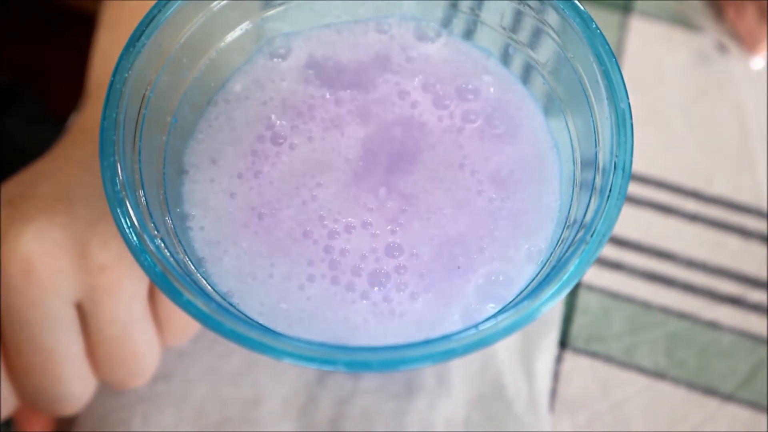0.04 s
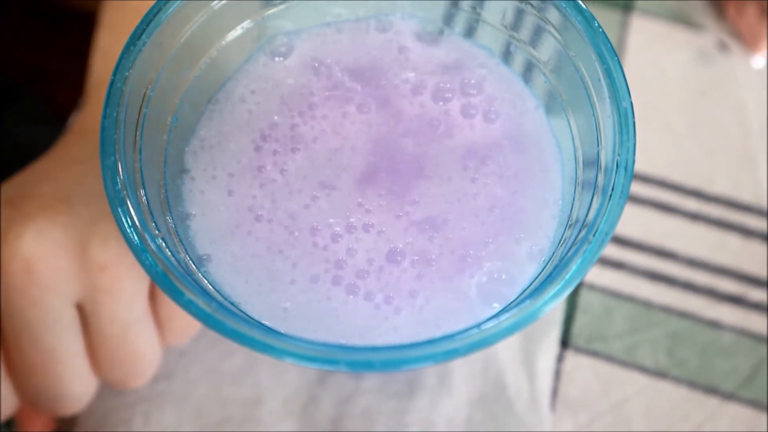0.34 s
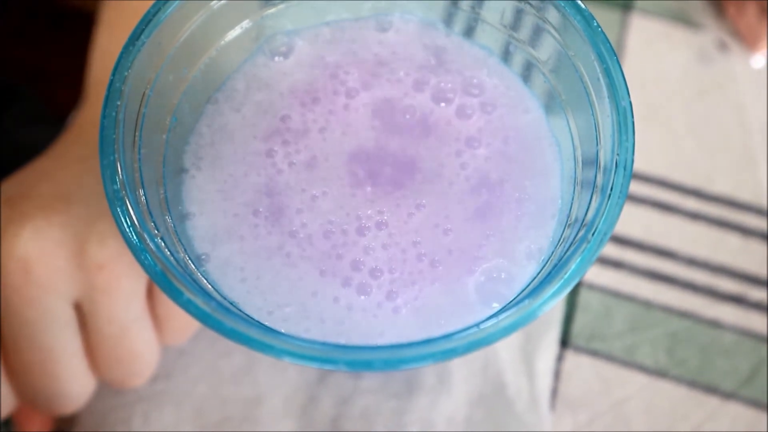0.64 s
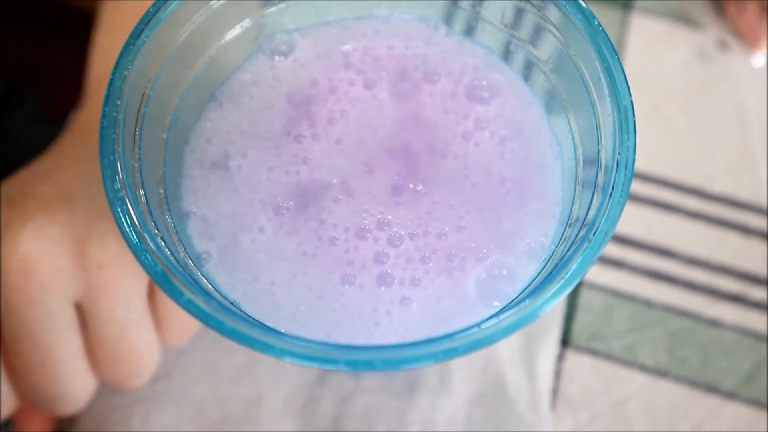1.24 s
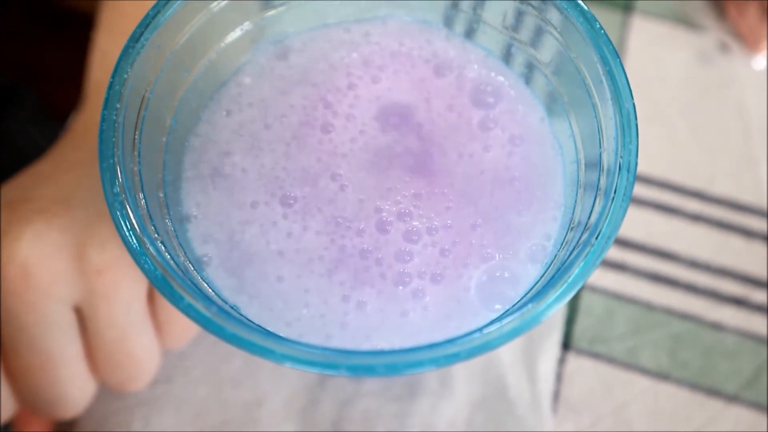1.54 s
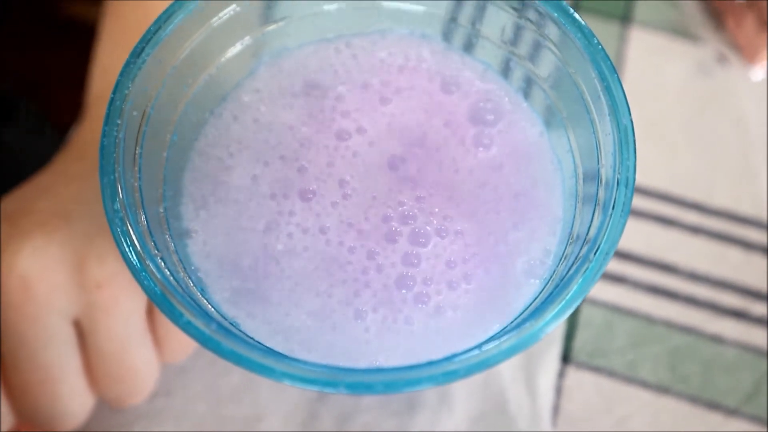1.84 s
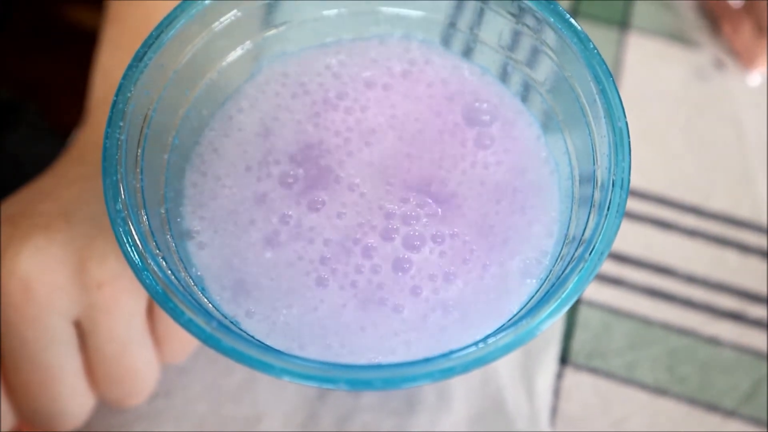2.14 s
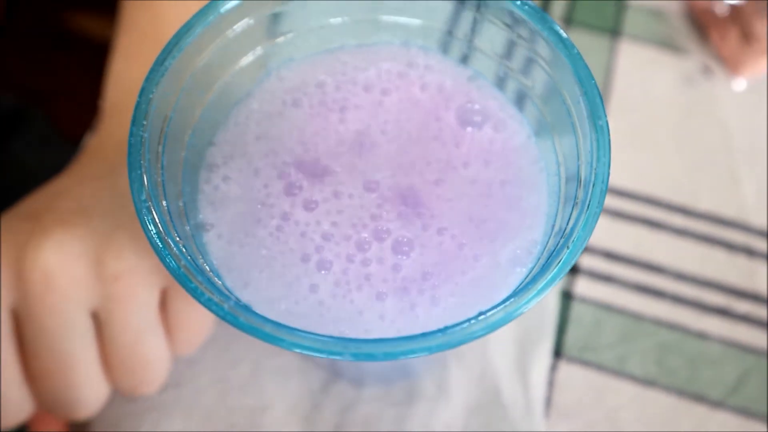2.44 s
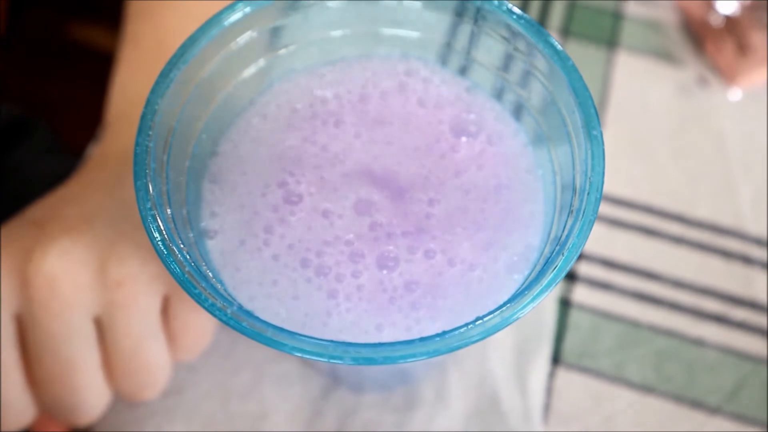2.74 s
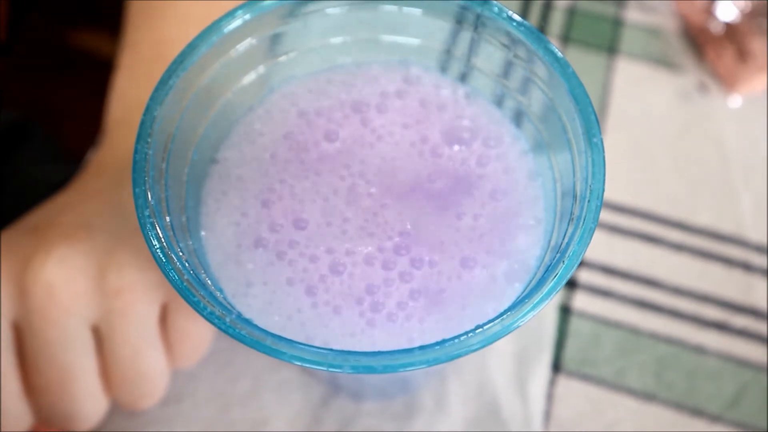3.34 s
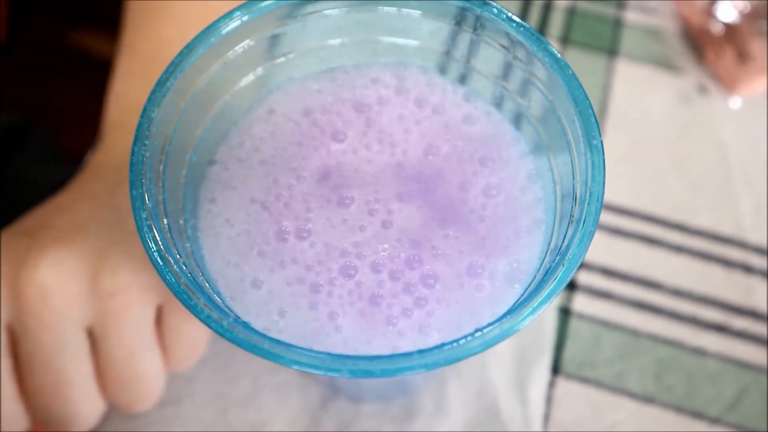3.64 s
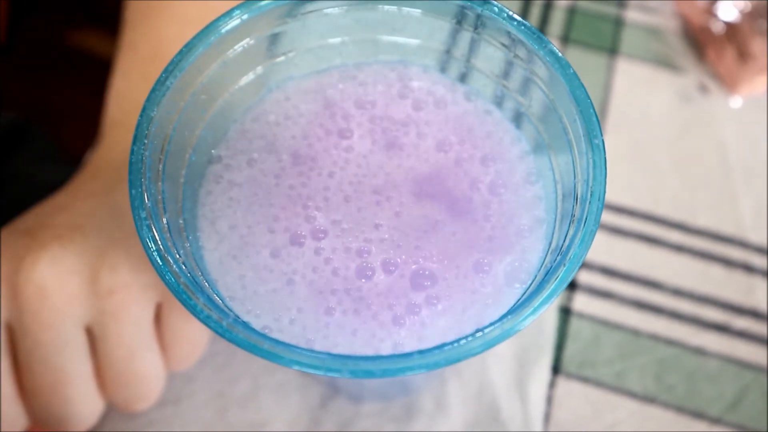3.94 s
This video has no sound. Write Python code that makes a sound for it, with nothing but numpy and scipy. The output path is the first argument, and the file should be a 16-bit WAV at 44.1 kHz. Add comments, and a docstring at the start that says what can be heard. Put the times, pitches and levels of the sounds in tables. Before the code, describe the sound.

A dense, crackling fizz of foamy liquid is heard up close indoors, growing slightly coarser as it goes. Small pops and dull ticks from the plastic cup dot the hiss, with a quiet low hum behind.

```python
"""A room with a low rumble and a humming appliance; close by, foam fizzes in a hand-held plastic cup.
Thousands of tiny bubbles burst each second, each a damped ring coloured by the air in the cup.
Coarser bubbles build up over the first two seconds; a few bigger ones pop.
The cup ticks faintly and bumps softly in the hand."""
import sys
import numpy as np
from scipy.fft import rfft, irfft, next_fast_len
from scipy.io import wavfile
from scipy.ndimage import map_coordinates

SR = 44100
rng = np.random.default_rng(int(sys.argv[2]) if len(sys.argv) > 2 else 0)


def inscribe(sig):
    """Save sig as 16-bit PCM at rate SR to the path in sys.argv[1].

    A 1-D sig is mono; a 2-D sig holds one channel per row.
    Samples are clipped to [-1, 1] before scaling.
    """
    pcm = np.round(np.clip(np.atleast_2d(sig).T, -1, 1) * 32767)
    wavfile.write(sys.argv[1], SR, pcm.astype(np.int16))


N = 176400

# room noise spectrum: freq_hz, density_db
RUMBLE_SPECTRUM = [(20, -9), (34, -2.5), (44, 3), (55, -5), (100, -2.5), (145, -4.5), (200, -8), (300, -8),
                   (450, -8.5), (700, -11), (1100, -14), (2000, -17), (6000, -41)]
# room noise, left-right likeness: freq_hz, correlation
RUMBLE_CORRELATION = [(40, 0.93), (100, 1), (150, 0.22), (220, 0.53), (350, -0.33), (650, -0.42),
                      (1100, -0.29), (2000, -0.52)]
# room noise envelope: time_s, level_db
RUMBLE_LEVEL = [(0, -50), (2, -50), (4, -49)]
# drone envelope: time_s, level_db
DRONE_LEVEL = [(0, -52.5), (.16, -46), (.29, -55.5), (.42, -49.5), (.63, -53), (.73, -49.5), (.86, -51.5),
               (1.0, -53), (1.16, -49), (1.33, -47), (1.43, -53), (1.54, -51), (1.68, -65), (1.82, -48.5),
               (2.05, -60), (2.33, -60), (2.46, -49), (2.63, -66), (2.76, -48.5), (2.88, -52), (3.01, -60),
               (4, -68)]
# mains hum envelope: time_s, level_db
HUM_LEVEL = [(0, -53), (.8, -51.5), (1.6, -54.5), (2.34, -53), (2.48, -44), (3.05, -47), (3.4, -48),
             (4, -46.5)]
# handling bumps: start_s, peak_db
BUMPS = [(.68, -47), (2.431, -48)]
# cup ticks: start_s, pitch_hz, width_oct, peak_db
TICKS = [(.1622, 1150, 0.38, -37.5), (0.8418, 1330, 0.75, -25), (.8432, 2400, .2, -33),
         (2.284, 1160, 0.23, -35), (2.3045, 1100, 0.23, -40), (2.318, 1150, 0.3, -47)]
# bigger bubbles: start_s, pitch_hz, peak_db, tail_re_click_db
POPS = [(.156, 3400, -38, -4), (1.326, 2900, -41, 0), (1.333, 2550, -39.5, -1), (1.335, 3300, -41.5, -3),
        (1.4915, 3480, -31, 1), (1.6755, 3400, -35.5, -2), (1.8662, 3650, -31.7, 2),
        (2.4315, 3000, -33.5, -5), (2.823, 3450, -35.5, 0), (2.838, 3500, -36.5, -5),
        (3.013, 3750, -33.5, -3), (3.409, 3550, -32.5, 1), (3.627, 3500, -33.5, -1),
        (3.9098, 3550, -30, -4)]
# foam envelopes before layer gain: time_s, coarse_db, fine_db
FOAM_LEVELS = [(0.03, -48.5, -43.5), (0.53, -49, -43.5), (2.03, -45.5, -43.5), (2.8, -46, -44.5),
               (3.94, -46, -44), (3.95, -44.5, -44)]
# colour of coarse bubbles in the cup: freq_hz, gain_db
COARSE_COLOUR = [(600, -8.5), (1170, -8.5), (1380, -1.3), (1520, 1), (1700, -4.5), (1870, -1), (2080, 0),
                 (2300, -2), (2700, -0.6), (2860, 2), (3040, -0.4), (3250, -3), (4400, -2.5), (5600, -2.5),
                 (6600, -2), (8000, -20)]
# colour of fine bubbles: freq_hz, gain_db
FINE_COLOUR = [(2500, -8), (4400, -6.5), (5600, -5), (7000, -0.65), (9000, -1.5), (10800, -0.5),
               (12000, -5), (13200, -9.5), (14200, -17), (15000, -46)]
# fizz, left-right likeness: freq_hz, correlation
FIZZ_CORRELATION = [(900, 0.22), (1450, 0.72), (1700, 0.65), (2000, 0.85), (2350, 0.61), (2950, 0.6),
                    (3600, 0.88), (5300, 0.81), (6200, 0.47), (7000, 0.45), (7500, 0.59), (9100, 0.73),
                    (10200, 0.42), (12500, 0.091)]
# fizz balance: freq_hz, left_minus_right_db
FIZZ_BALANCE = [(1500, 0.8), (2200, -0.5), (2500, -0.5), (2950, -1.5), (3500, 0), (5000, 0.2), (6100, 2),
                (7000, 1), (9500, -.3), (12000, 0.6)]

COARSE_PER_S, FINE_PER_S = 11000, 36000
COARSE_GAIN_DB, FINE_GAIN_DB = 2, 2.5
COARSE_FLURRY_DB, FINE_FLURRY_DB = 0.38, 0.41


def amp(db):
    """dB to gain."""
    return 10 ** (np.asarray(db) / 20)


def along(points, hz):
    """Table value at hz, on a log frequency axis."""
    freq_hz, values = np.transpose(points)
    return np.interp(np.log(hz + 1), np.log(freq_hz + 1), values)


def curves(rows):
    """One per-sample curve for each column after time_s."""
    time_s, *columns = np.transpose(rows)
    return [np.interp(np.arange(N) / SR, time_s, column) for column in columns]


def wobble(knots_per_s):
    """Smooth random curve."""
    return map_coordinates(rng.standard_normal(1024), [np.arange(N) * knots_per_s / SR], mode="wrap")


def filtered(x, response):
    """x through a frequency response."""
    size = next_fast_len(N + SR // 2)
    return irfft(rfft(x, size) * response(np.fft.rfftfreq(size, 1 / SR)), size)[..., :N]


def stereo(pair, colour, correlation):
    """Two independent signals, coloured and blended to left and right at rms 1."""
    def response(hz):
        blend_rad = np.arccos(np.clip(along(correlation, hz), -1, 1)) / 2
        return amp(along(colour, hz)) * [np.cos(blend_rad), np.sin(blend_rad)]
    mid, side = filtered(pair, response)
    x = np.array([mid + side, mid - side])
    return x / np.sqrt(np.mean(x ** 2) + 1e-20)


def snap(start_s, pitch_hz, width_oct, tail_s, tail_db):
    """Band-passed click and its scattered ring in the cup, peak 1."""
    t = np.arange(SR // 10) / SR
    tail = rng.standard_normal(len(t)) * np.exp(-t / tail_s)
    impulse = t == 0
    blow = np.zeros(N + len(t))
    blow[round(start_s * SR):][:len(t)] = impulse + amp(tail_db) * tail / np.linalg.norm(tail)
    click = filtered(blow[:N], lambda hz: np.exp(-.5 * (np.log2((hz + 1) / pitch_hz) / width_oct) ** 2))
    return click / np.abs(click).max()


def rumble():
    """Low room noise, wide above the bass."""
    noise = stereo(rng.standard_normal((2, N)), RUMBLE_SPECTRUM, RUMBLE_CORRELATION)
    return amp(curves(RUMBLE_LEVEL)[0]) * noise


def drone(pitch_hz=80.2, wander_rad=0.25):
    """Low tone, wavering in level and phase."""
    phase = 2 * np.pi * pitch_hz * np.arange(N) / SR + wander_rad * wobble(7.8)
    return np.sqrt(2) * amp(curves(DRONE_LEVEL)[0]) * np.sin(phase)


def hum(pitch_hz=119.56, third_db=-72.5):
    """Appliance mains hum with a steady third harmonic."""
    phase = 2 * np.pi * pitch_hz * np.arange(N) / SR
    fundamental = amp(curves(HUM_LEVEL)[0]) * np.sin(phase)
    return np.sqrt(2) * (fundamental + amp(third_db) * np.sin(3 * phase))


def bumps(pitch_hz=45, rise_s=.03, fall_s=.07):
    """Soft handling bumps: low damped sines, centred."""
    x = np.zeros(N)
    for start_s, peak_db in BUMPS:
        t = np.clip(np.arange(N) / SR - start_s, 0, 30 * fall_s)
        envelope = (1 - np.exp(-t / rise_s)) ** 2 * np.exp(-t / fall_s)
        x += amp(peak_db) * envelope / envelope.max() * np.sin(2 * np.pi * pitch_hz * t)
    return x


def ticks(tail_s=0.0046, tail_db=-3, left_lag_s=0.00016):
    """Dull ticks of the held cup, slightly to the right."""
    x = sum(amp(peak_db) * snap(start_s, pitch_hz, width_oct, tail_s, tail_db)
            for start_s, pitch_hz, width_oct, peak_db in TICKS)
    return filtered(x, lambda hz: np.exp(-2j * np.pi * np.outer([left_lag_s, 0], hz)))


def pops(width_oct=.18, tail_s=.013):
    """Bigger bubbles snap and ring briefly in the cup, centred."""
    return sum(amp(peak_db) * snap(start_s, pitch_hz, width_oct, tail_s, tail_db)
               for start_s, pitch_hz, peak_db, tail_db in POPS)


def bursts(per_s, low_hz, high_hz, ring_samples, decay_cycles=3.44, spread_db=0.5):
    """Tiny bubbles burst at random: damped rings, uniform in pitch."""
    when, pitch, strength, sign = rng.random((int(per_s * N / SR), 4)).T
    pitch_hz = (low_hz + (high_hz - low_hz) * pitch)[:, None]
    gain = amp(spread_db * np.minimum(-np.log(1 - strength), 4)) * np.sign(sign - .5)
    cycles = pitch_hz * np.arange(ring_samples) / SR
    rings = np.sin(2 * np.pi * cycles) * np.exp(-cycles / decay_cycles)
    rings *= gain[:, None] * np.sqrt(pitch_hz)  # sqrt evens out energy across pitch
    index = (when * N).astype(int)[:, None] + np.arange(ring_samples)
    return np.bincount(index.ravel(), rings.ravel())[:N]


def fizz():
    """Coarse and fine bubbles burst in slight flurries, two independent showers each."""
    coarse_db, fine_db = curves(FOAM_LEVELS)
    coarse_pair = [bursts(COARSE_PER_S, low_hz=870, high_hz=7400, ring_samples=160) for _ in range(2)]
    fine_pair = [bursts(FINE_PER_S, low_hz=3030, high_hz=15500, ring_samples=64) for _ in range(2)]
    coarse = stereo(coarse_pair, COARSE_COLOUR, FIZZ_CORRELATION)
    fine = stereo(fine_pair, FINE_COLOUR, FIZZ_CORRELATION)
    coarse *= amp(coarse_db + COARSE_GAIN_DB + COARSE_FLURRY_DB * wobble(13))
    fine *= amp(fine_db + FINE_GAIN_DB + FINE_FLURRY_DB * wobble(16))
    return filtered(coarse + fine, lambda hz: amp(np.outer([.5, -.5], along(FIZZ_BALANCE, hz))))


def scene():
    """The cup in front of the room."""
    return fizz() + pops() + ticks() + bumps() + hum() + drone() + rumble()


def record(dry):
    """Brick-wall low-pass."""
    cutoff_hz = 14750
    return filtered(dry, lambda hz: hz < cutoff_hz)


dry = scene()
out = record(dry)
inscribe(out)
```